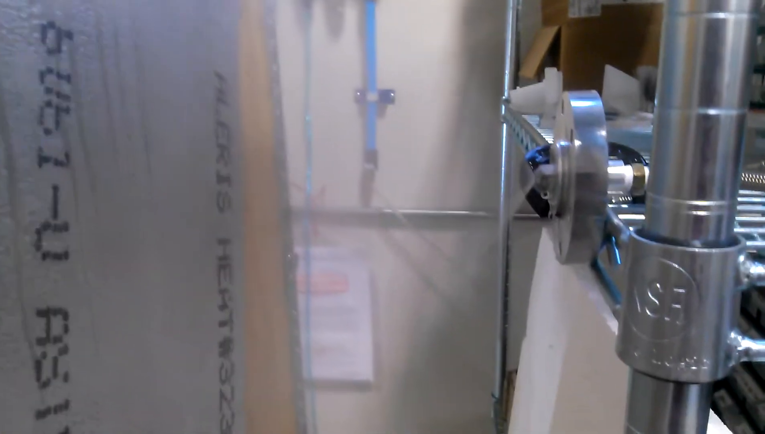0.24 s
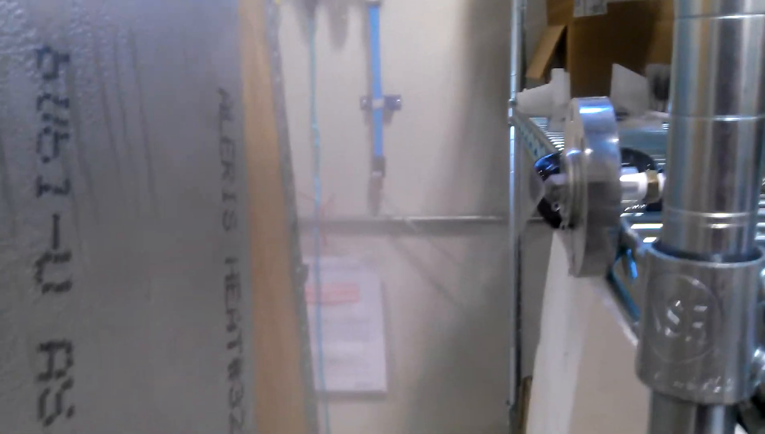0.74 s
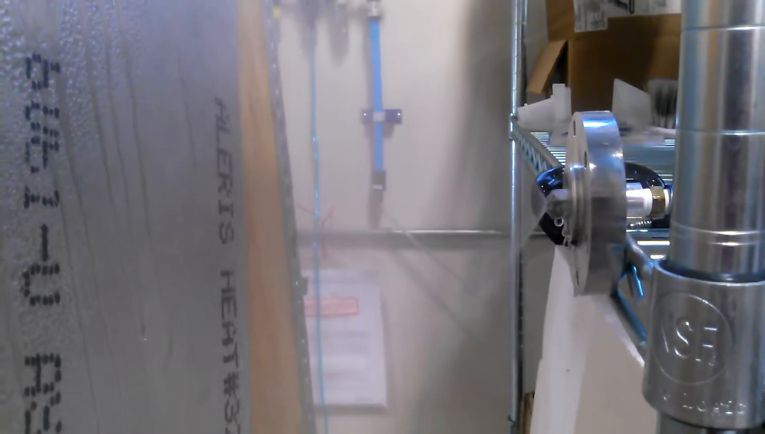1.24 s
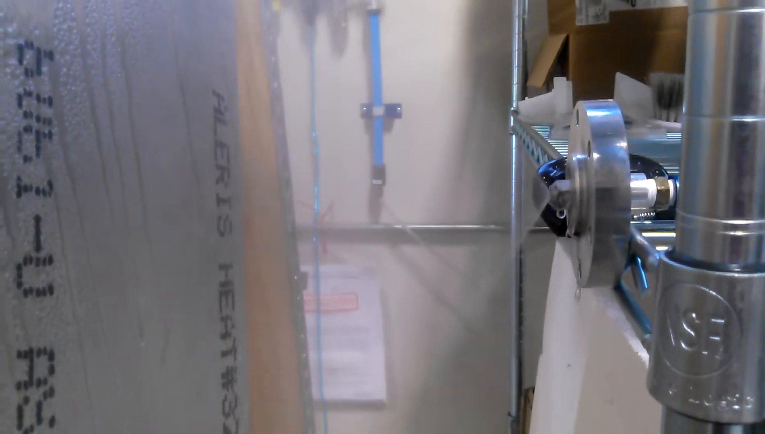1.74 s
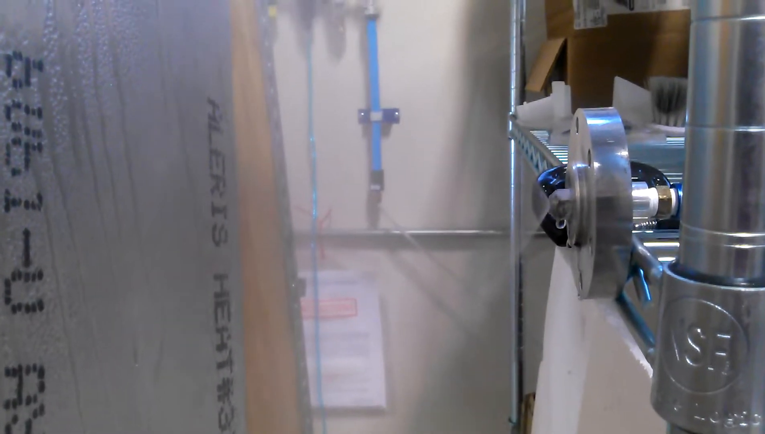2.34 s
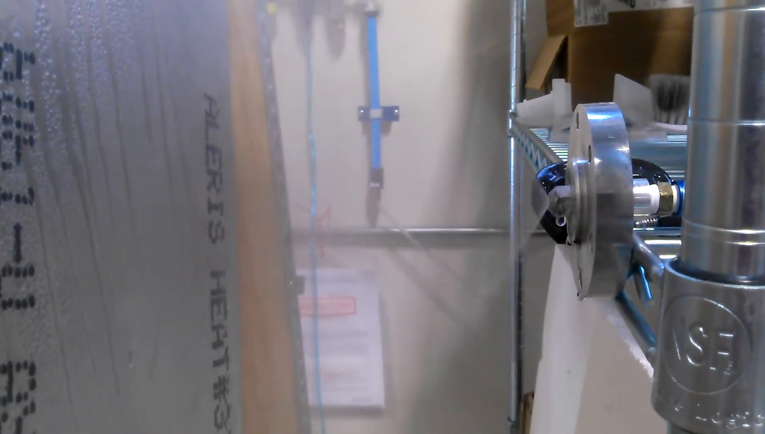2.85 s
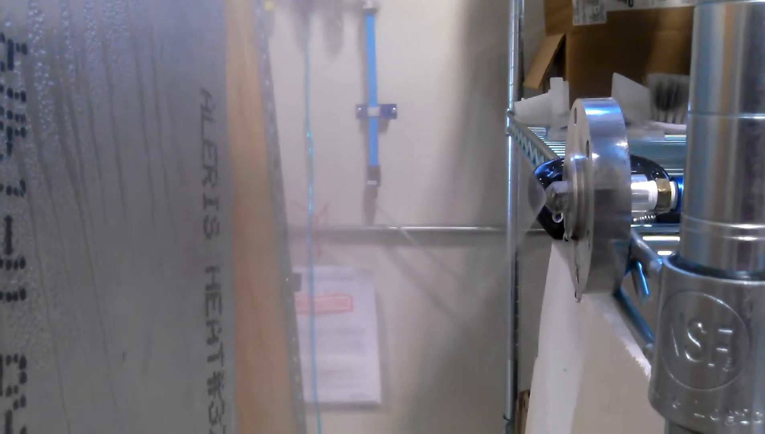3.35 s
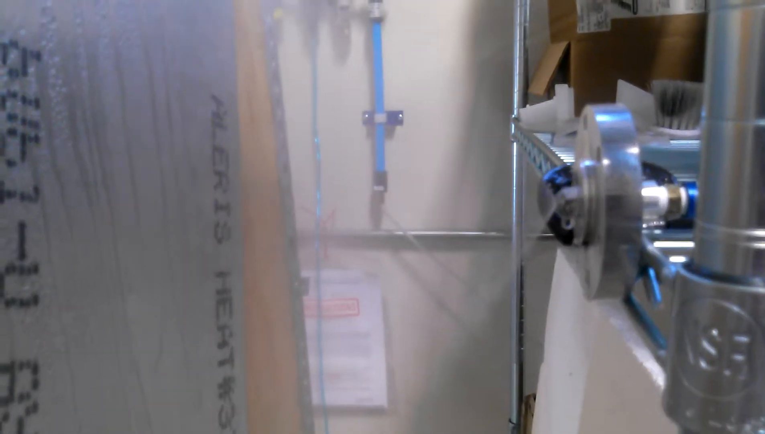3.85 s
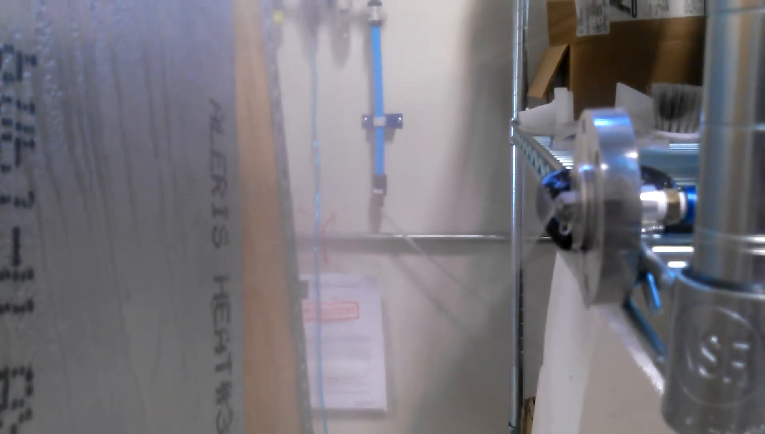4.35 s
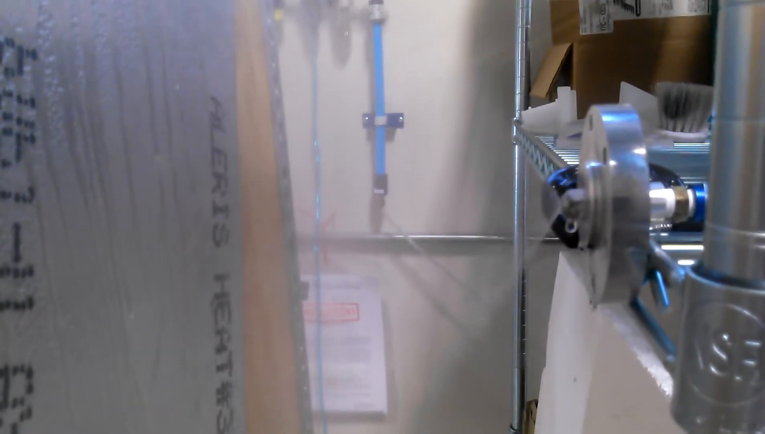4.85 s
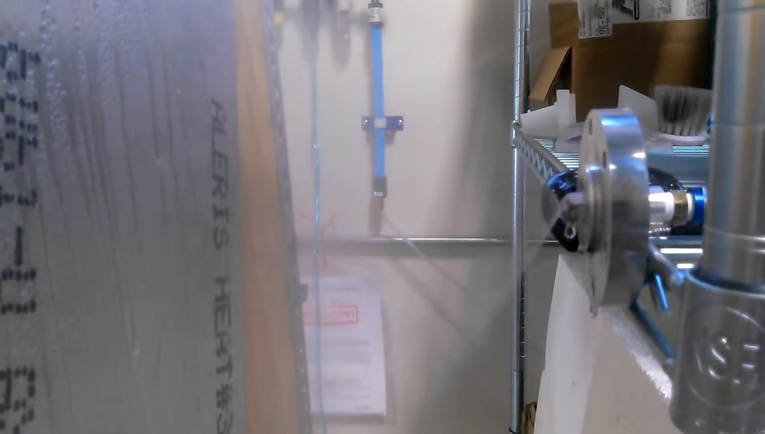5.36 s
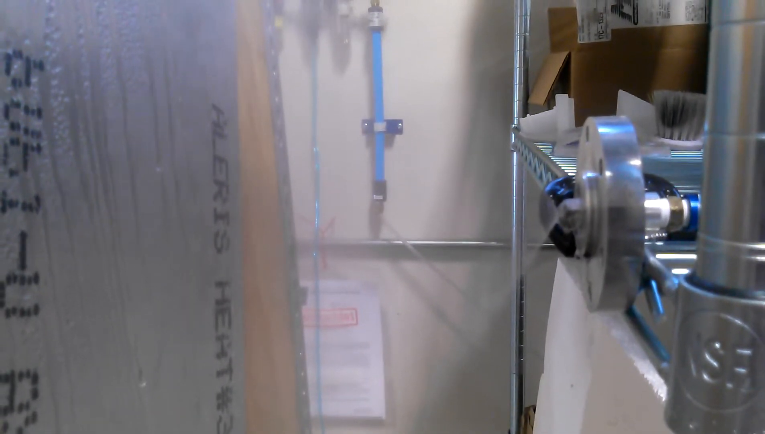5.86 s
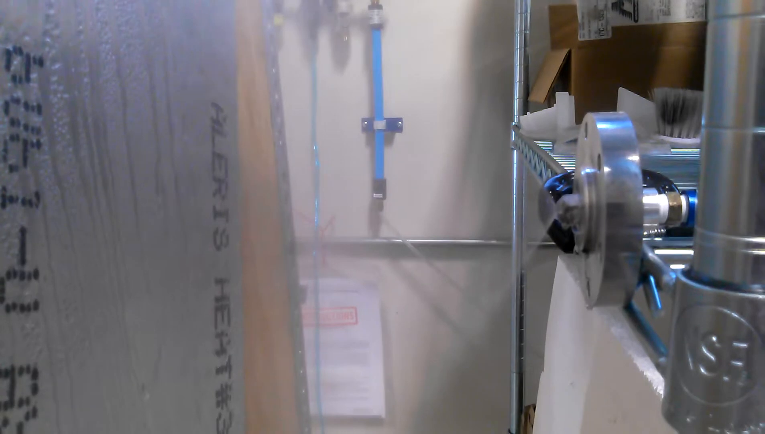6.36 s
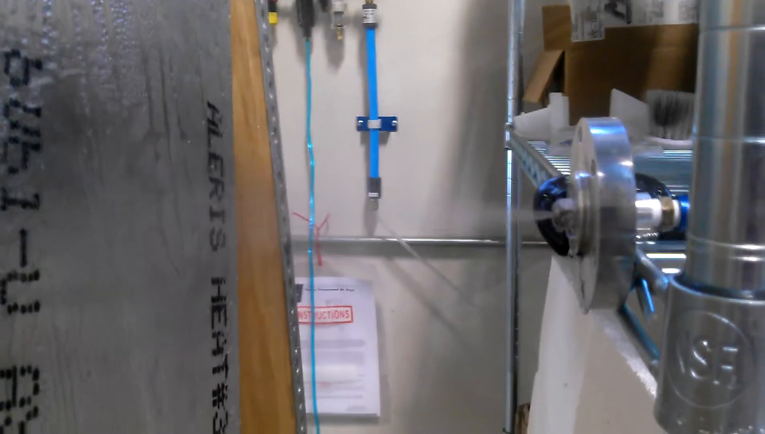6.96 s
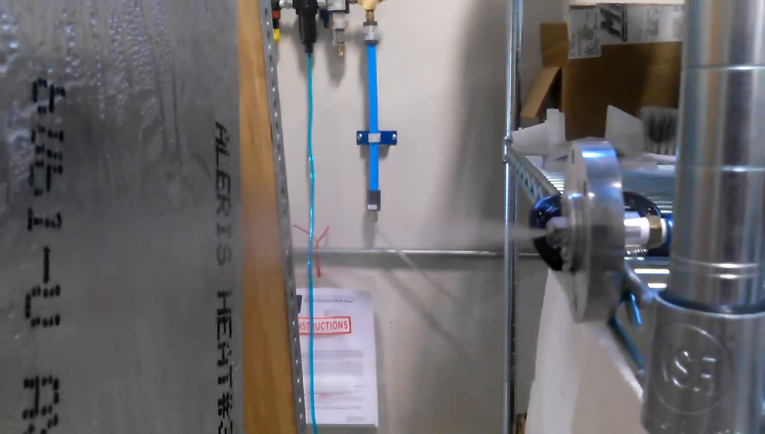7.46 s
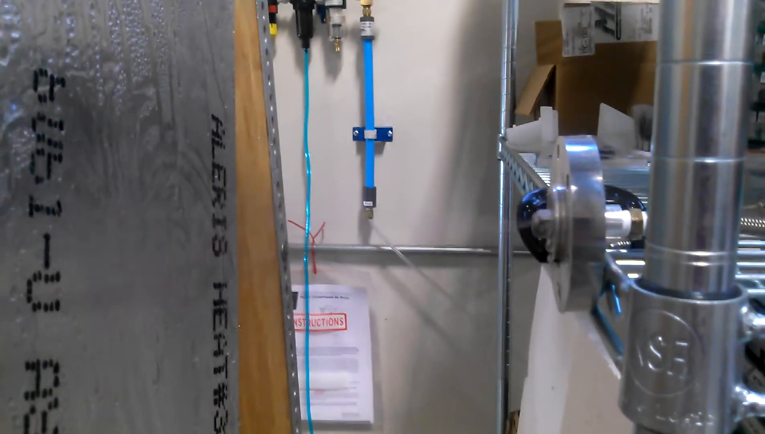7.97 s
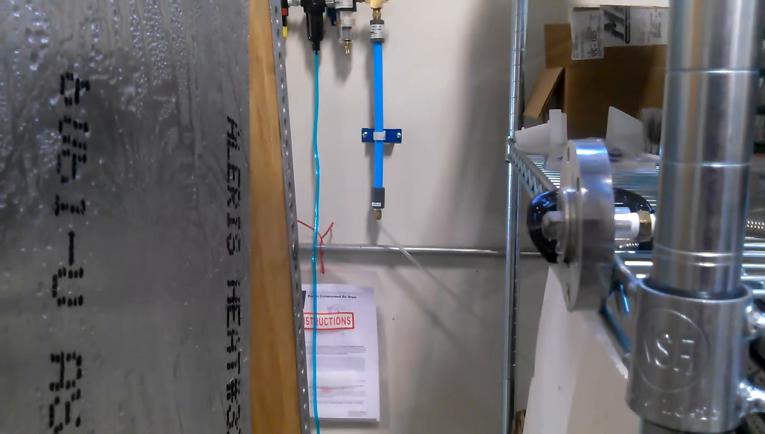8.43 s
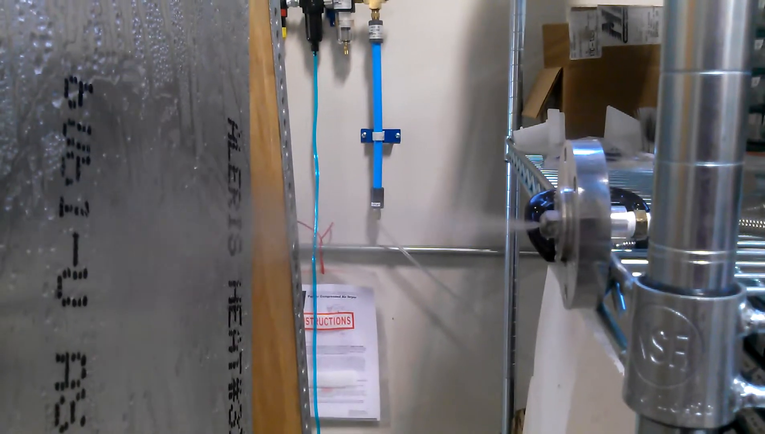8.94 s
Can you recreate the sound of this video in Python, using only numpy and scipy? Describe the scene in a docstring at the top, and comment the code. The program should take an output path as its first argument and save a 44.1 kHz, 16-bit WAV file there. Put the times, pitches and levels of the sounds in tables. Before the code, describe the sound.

From 0 s a fine water mist hisses softly and thinly, mostly high-pitched, with a faint soft rush beneath it. A motor hums low and wavers gently, with steady rumble, drone and a very faint whine. Light metallic rack knocks come at about 0.2 to 0.5 s, the strongest near 0.24 s; a soft scuff follows at 1 s, a thin tick at 1.55 s and a faint knock at 2.0 s. The hiss shifts colour slightly until about 1.9 s, then stays steady. At 6.25 s the nozzle opens almost instantly into a loud, full, roaring jet, brightest at its onset, with a brief ringing edge and grainy high fizz. It sags slightly at 7.2 and 7.8 s, recovering each time, and rises a little before cutting dead at 8.5 s, leaving total silence. The microphone is close, indoors, identical in both channels.

```python
"""A fine mist hisses over the hum of a motor, with a few light knocks and faint contacts early on.
Then the nozzle opens to a hard, roaring jet under a high, grainy fizz, and everything cuts to silence.
The place is a metal rack with a high-pressure nozzle facing an aluminium sheet, close to a camera.
Water is shaped, patchy noise; the motor is a wavering sine and resonant noise; knocks are damped modes.
One microphone feeds both channels."""
import sys
import numpy as np
from scipy import signal
from scipy.fft import rfft, irfft, next_fast_len
from scipy.io import wavfile
from scipy.ndimage import uniform_filter1d, map_coordinates

SR = 44100
rng = np.random.default_rng(int(sys.argv[2]) if len(sys.argv) > 2 else 0)


def materialize(psi):
    """Save the field psi as 16-bit PCM at rate SR to the path in sys.argv[1].

    A 1-D psi becomes a single channel; in a 2-D psi each row is a channel.
    """
    bounded = np.clip(np.atleast_2d(psi).T, -1, 1)
    quanta = np.round(bounded * 32767).astype(np.int16)
    wavfile.write(sys.argv[1], SR, quanta)


N = 405719
TIME = np.arange(N) / SR  # (s)
JET_ON_S, CUT_S = 6.2545, 8.4877


def amp(db):
    """Decibels to gain."""
    return 10 ** (np.asarray(db) / 20)


def unit(x):
    """Scale to rms 1."""
    return x / np.sqrt(np.mean(x ** 2) + 1e-20)


def since(start_s):
    """Seconds elapsed after start_s, zero before it."""
    return np.maximum(TIME - start_s, 0)


def curves(rows):
    """One value per sample for each column after the time."""
    time_s, *columns = np.transpose(rows)
    return [np.interp(TIME, time_s, column) for column in columns]


def wobble(rate):
    """A smooth random curve through rate knots a second."""
    knots = rng.standard_normal(int(N * rate / SR) + 4)
    return map_coordinates(knots, [TIME * rate])


def filtered(x, response):
    """x times a response of frequency, with padding so that its end does not wrap round."""
    size = next_fast_len(N + SR // 2)
    return irfft(rfft(x, size) * response(np.fft.rfftfreq(size, 1 / SR)), size)[:N]


def colour(points, bumps=()):
    """Response through (Hz, dB) points, with narrow peaks and notches on top."""
    point_hz, point_db = np.transpose(points)

    def response(hz):
        base_db = np.interp(np.log(hz + 1), np.log(point_hz), point_db, -120, -120)
        lift_db = sum(lift / (1 + (2 * (hz - centre) / width) ** 2) for centre, width, lift in bumps)
        return amp(base_db + lift_db)
    return response


def resonances(modes):
    """Response of a set of (Hz, width Hz, dB) peaks, their powers added."""
    def response(hz):
        power = sum(amp(db) ** 2 / (1 + (1.3 * (hz - centre) / width) ** 2) ** 2
                    for centre, width, db in modes)
        return np.sqrt(power)
    return response


def turbulence(response, patchy_db):
    """Coloured noise of rms 1; random patches of it in time and frequency are lifted and lowered."""
    spectrum = signal.stft(rng.standard_normal(N), nperseg=512)[2]
    patches = uniform_filter1d(rng.standard_normal(spectrum.shape), size=8, axis=0)  # across frequency
    patches = uniform_filter1d(patches, size=14, axis=1)  # across time
    noise = signal.istft(spectrum * amp(patchy_db * unit(patches)), nperseg=512)[1][:N]
    return unit(filtered(noise, response))


# Sudden dips of the jet, each building up again: start_s, depth_db (before fall and recovery shape it)
JET_DIPS = [(7.165, 1.45), (7.765, 1.3)]
# Colour of the roar: pitch_hz, level_db (relative, per Hz)
ROAR_COLOUR = [(15, -6), (50, -6), (130, -2), (300, -0.5), (1000, -0.8), (2500, 0), (5000, 0),
               (6500, -0.26), (6950, -3.5), (7350, -8.5), (7900, -22.5), (8600, -39)]
# Ringing of the nozzle as the jet starts: pitch_hz, width_hz, level_db (relative)
JET_RING_MODES = [(5740, 250, -1.5), (6620, 90, -1), (6640, 250, -4.5), (7500, 350, -14)]
# Colour of the high fizz: pitch_hz, level_db (relative, per Hz)
FIZZ_COLOUR = [(5000, -32), (7000, 0), (7600, 3.5), (8100, -1.5), (8750, -3), (9100, -7.5), (9500, -10.5),
               (9900, -22), (10200, -40.5)]


def jet_flow_db(fall_s=.015, recovery_s=.3, last_rise_db=.9, last_rise_s=.2):
    """Level of the jet: a slight flutter, sudden dips that build up again, and a rise just before the end."""
    flow_db = .17 * wobble(33)
    for start_s, depth_db in JET_DIPS:
        elapsed = since(start_s)
        flow_db -= depth_db * (1 - np.exp(-elapsed / fall_s)) * np.exp(-elapsed / recovery_s)
    return flow_db + last_rise_db * np.exp(np.minimum(TIME - CUT_S, 0) / last_rise_s)


def jet(roar_db=-12.5, ring_db=-9, ring_life_s=.6, fizz_db=-31.0, onset_lift_db=4, onset_life_s=.2,
        fizz_follows=1.3):
    """Full flow roars as turbulent noise; a high, grainy fizz lies over the roar, strongest at the onset."""
    flow_db = jet_flow_db()
    roar = turbulence(colour(ROAR_COLOUR), patchy_db=.5)
    # the nozzle's ring, set against the roar, fades as the flow settles
    ring_fade = np.exp(-since(JET_ON_S) / ring_life_s)
    ring = amp(ring_db) * ring_fade * turbulence(resonances(JET_RING_MODES), patchy_db=3.2)
    # fast random gain makes the noise grainy
    grainy_noise = rng.standard_normal(N) * amp(3.6 * wobble(1200))
    onset_db = onset_lift_db * np.exp(-since(JET_ON_S) / onset_life_s)
    fizz_level_db = fizz_db + onset_db + fizz_follows * flow_db + .9 * wobble(25)
    fizz = amp(fizz_level_db) * unit(filtered(grainy_noise, colour(FIZZ_COLOUR)))
    return amp(roar_db + flow_db) * (roar + ring) + fizz


# Strength of the mist's hiss: time_s, level_db (before trim and flutter)
HISS_LEVEL = [(0, -35.6), (2.2, -35), (3.4, -34.5), (4.5, -34), (5.9, -35)]
# Colour of the hiss: pitch_hz, level_db (relative, per Hz)
HISS_COLOUR = [(1470, -51), (2500, -21.5), (2690, -11), (3470, -10.5), (3770, -7), (4610, -6.5),
               (5480, -0.5), (5980, -2), (6440, 0.5), (6820, -4.5), (8020, -22), (9430, -21.5),
               (9930, -40.5), (12900, -62.5), (21800, -120)]
# Resonances between nozzle and sheet while the camera still moves: pitch_hz, width_hz, lift_db
MOVING_RESONANCES = [(2480, 130, -12), (3300, 140, 6), (3650, 200, -1.5), (4410, 110, 5.5),
                     (4780, 130, 5.5), (5100, 160, -9.5), (5650, 150, 5.5), (6870, 200, 2), (7220, 250, 4),
                     (7700, 230, -7), (8250, 200, -7)]
# Resonances around the nozzle once the camera rests: pitch_hz, width_hz, lift_db
RESTING_RESONANCES = [(2480, 130, -4.5), (2800, 80, 0.5), (3850, 80, 6), (4380, 71, -4), (4380, 60, 7.5),
                      (5320, 80, 2.5), (5660, 150, 4), (5940, 150, -3), (6270, 90, 2), (6670, 240, 2.5),
                      (6980, 120, -3), (7300, 120, 3), (8020, 220, -3), (8700, 200, 2.5), (9050, 160, -5.5)]
# Colour of the soft rush: pitch_hz, level_db (relative, per Hz)
RUSH_COLOUR = [(180, -25.5), (290, -0.5), (450, -2), (760, -4), (1350, -2.5), (1600, -5), (2300, -4),
               (2600, -6), (3400, -37.5)]
# Resonances of the soft rush: pitch_hz, width_hz, lift_db
RUSH_RESONANCES = [(567, 43, 3.5), (915, 130, 2.5), (1128, 90, -6), (1785, 70, 4), (1940, 70, 4),
                   (2210, 90, 5), (2480, 130, -10.5)]


def mist(rest_s=1.9, moving_s=1.6, hiss_trim_db=.3, rush_db=-48.5, flutter_depth_db=0.18):
    """Atomised water hisses at the orifice, its colour shifting as the camera settles; the cloud rushes."""
    hiss_db, = curves(HISS_LEVEL)
    flutter_db = flutter_depth_db * wobble(25)
    moving = turbulence(colour(HISS_COLOUR, MOVING_RESONANCES), patchy_db=0.4)
    resting = turbulence(colour(HISS_COLOUR, RESTING_RESONANCES), patchy_db=0.22)
    # equal-power crossfade that ends at rest_s
    turn = np.pi / 2 * np.clip(1 + (TIME - rest_s) / moving_s, 0, 1)
    hiss = np.cos(turn) * moving + np.sin(turn) * resting
    rush = turbulence(colour(RUSH_COLOUR, RUSH_RESONANCES), patchy_db=0.86)
    return amp(flutter_db) * (amp(hiss_db + hiss_trim_db) * hiss + amp(rush_db) * rush)


# Chance swells and sags in level of the hum, drone and whine:
# middle_s, length_s, hum_lift_db, drone_lift_db, whine_lift_db
LEVEL_SWELLS = [(.38, .25, 1, 5, 2), (1.762, 0.23, 6, -1.5, 0), (3.35, 0.82, 5, 1, 4.5),
                (4.75, .55, 8, .5, 5)]
# Steady rumble of the motor: pitch_hz, width_hz, level_db (relative)
RUMBLE_MODES = [(46.7, 4, -5), (54, 3, -1), (70, 14, -9.5), (93, 7.4, -2.5), (114.3, 6.5, -1.5),
                (137.2, 7.7, -2)]
# Drone of the motor, ringing in the rack and the room: pitch_hz, width_hz, level_db (relative)
DRONE_MODES = [(166.5, 8.1, 2), (186.2, 5.3, -1), (209, 5.9, -6.5), (230, 39, -14), (275, 3.9, -8)]
# Faint whine of the motor: pitch_hz, width_hz, level_db (relative)
WHINE_MODES = [(567, 18, -6), (699, 9, -2), (878, 11, -0.5), (950, 22, -2)]


def motor(hum_hz=119.9, hum_db=-46.5, waver_db=3, rumble_db=-46, drone_db=-46.2, whine_db=-61.0):
    """A wavering hum near twice the mains frequency, a drone and a whine drift in level over steady rumble."""
    hum_lift_db, drone_lift_db, whine_lift_db = sum(
        np.outer(lifts, np.exp(-(2 * (TIME - middle_s) / length_s) ** 2))
        for middle_s, length_s, *lifts in LEVEL_SWELLS)
    phase = 2 * np.pi * hum_hz * TIME + .4 * wobble(13)
    hum_level_db = hum_db + hum_lift_db + waver_db * wobble(14)
    hum = amp(hum_level_db) * np.sqrt(2) * np.sin(phase)
    rumble = amp(rumble_db) * turbulence(resonances(RUMBLE_MODES), patchy_db=0.6)
    drone = amp(drone_db + drone_lift_db) * turbulence(resonances(DRONE_MODES), patchy_db=0.95)
    whine = amp(whine_db + whine_lift_db) * turbulence(resonances(WHINE_MODES), patchy_db=1.2)
    return hum + rumble + drone + whine


# Light knocks on the rack: start_s, level_db (scales ring and crack), crack_db (against the ring)
RACK_KNOCKS = [(.222, -31.5, 1), (.2415, -21.5, -3), (.3175, -33, -5), (.455, -39, 3), (2.029, -37.5, -3.5)]
# Damped modes of the rack: pitch_hz, level_db (before a random change at each knock), t60_s
RACK_MODES = [(416, -17, .03), (663, -2, 0.03), (728, -2, 0.032), (1350, -9, .018)]
# Colour of the contact itself: pitch_hz, level_db (relative, per Hz)
CRACK_COLOUR = [(150, -5.5), (600, 1), (1500, 3), (2500, -5.5), (4500, -19), (9000, -36)]


def knocks(attack_s=.0004, crack_t60_s=0.012):
    """Each knock is a short crack that rings the rack's damped modes at slightly new strengths."""
    out = np.zeros(N)
    t = np.arange(SR // 8) / SR
    contact = unit(filtered(rng.standard_normal(N), colour(CRACK_COLOUR)))
    for start_s, level_db, crack_db in RACK_KNOCKS:
        start = round(start_s * SR)
        ring = np.zeros(len(t))
        for pitch_hz, mode_db, t60_s in RACK_MODES:
            decay_db = mode_db + rng.normal(0, 1.2) - 60 * t / t60_s
            ring += amp(decay_db) * np.sin(2 * np.pi * pitch_hz * t)
        ring *= 1 - np.exp(-t / attack_s)
        crack = amp(crack_db - 60 * t / crack_t60_s) * contact[start:][:len(t)]
        out[start:][:len(t)] += amp(level_db) * (ring + crack)
    return out


# Faint contacts, a soft scuff and a thin tick: start_s, level_db (at onset), pitch_hz, width_hz, t60_s
FAINT_CONTACTS = [(.972, -44.5, 1200, 1500, .7), (1.554, -36.5, 2650, 900, .02)]


def scuffs():
    """Each light contact is a band of noise that starts at once and dies away."""
    out = np.zeros(N)
    for start_s, level_db, pitch_hz, width_hz, t60_s in FAINT_CONTACTS:
        band = unit(filtered(rng.standard_normal(N), resonances([(pitch_hz, width_hz, 0)])))
        out += (TIME >= start_s) * amp(level_db - 60 * since(start_s) / t60_s) * band
    return out


def scene(opening_s=.0009):
    """The mist turns into the jet within a few milliseconds; one microphone feeds both channels."""
    opened = .5 + .5 * np.tanh((TIME - JET_ON_S) / opening_s)
    water = opened * jet() + (1 - opened) * mist()
    mono = water + motor() + knocks() + scuffs()
    return np.array([mono, mono])


def record(dry, ceiling=.93, top_hz=10150):
    """The camera rounds off the highest peaks, the sound cuts off dead, and nothing stays above top_hz."""
    rounded = dry / (1 + np.abs(dry / ceiling) ** 10) ** (1 / 10)
    return np.array([filtered(channel * (TIME < CUT_S), lambda hz: hz < top_hz) for channel in rounded])


dry = scene()
out = record(dry)
materialize(out)
```